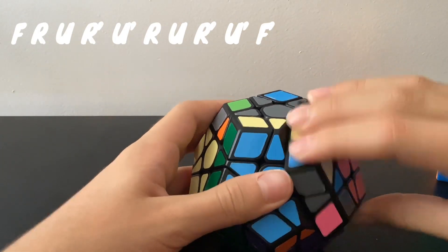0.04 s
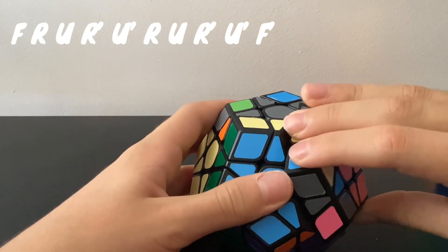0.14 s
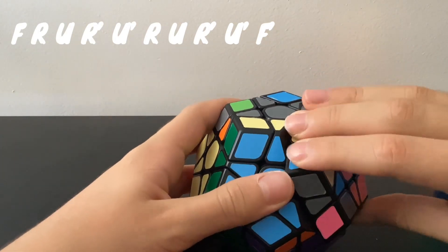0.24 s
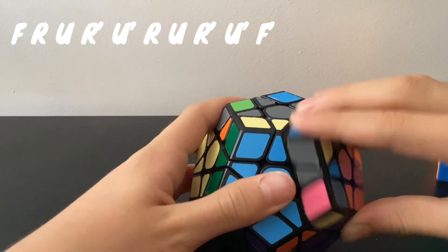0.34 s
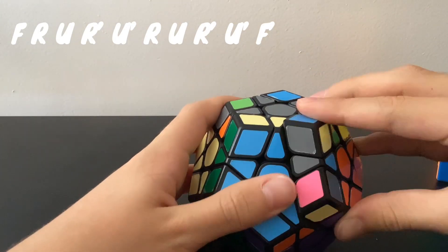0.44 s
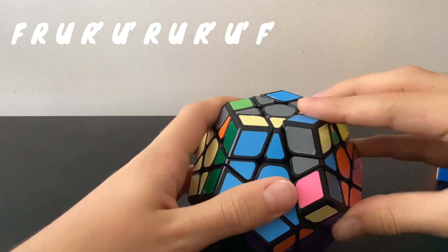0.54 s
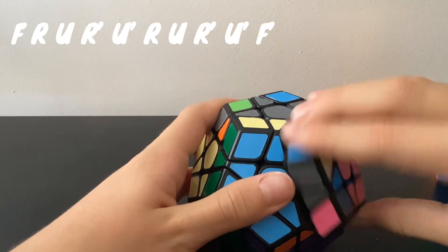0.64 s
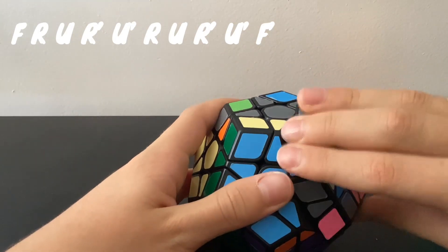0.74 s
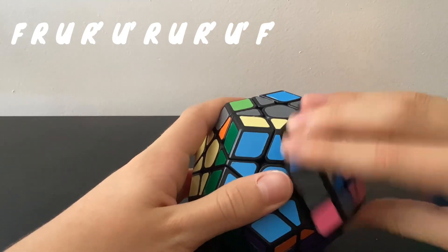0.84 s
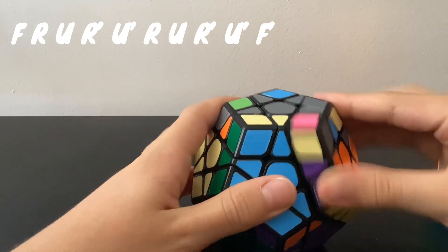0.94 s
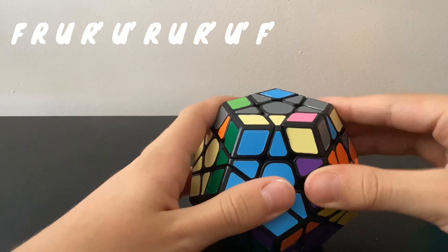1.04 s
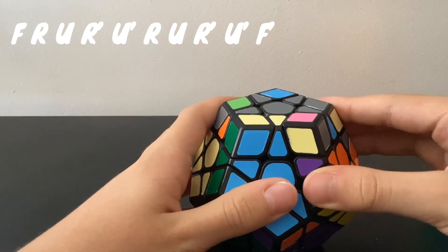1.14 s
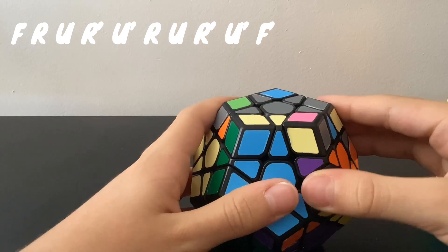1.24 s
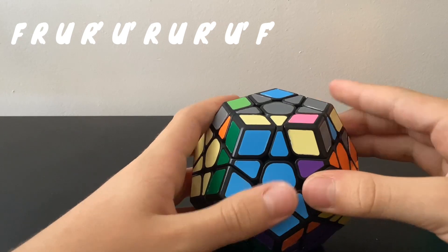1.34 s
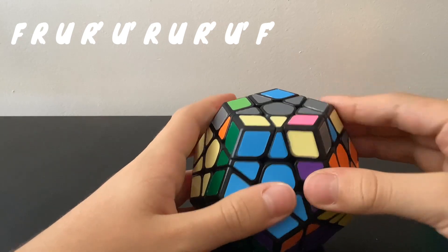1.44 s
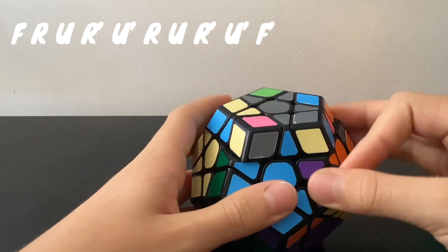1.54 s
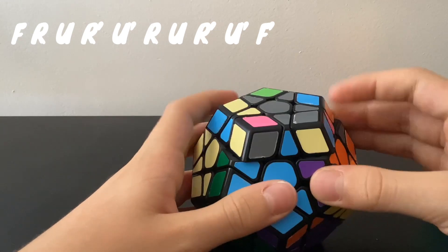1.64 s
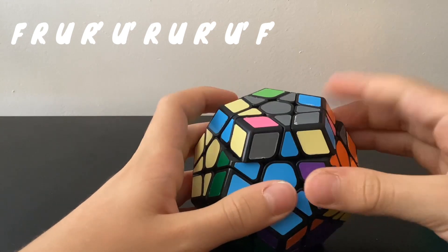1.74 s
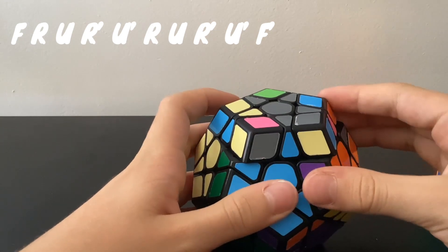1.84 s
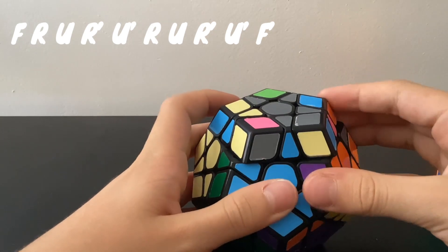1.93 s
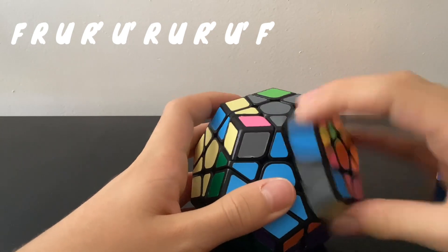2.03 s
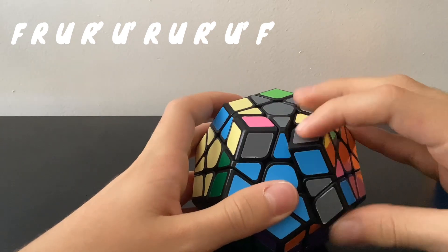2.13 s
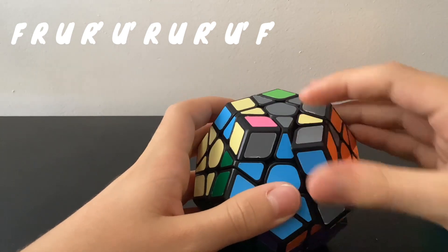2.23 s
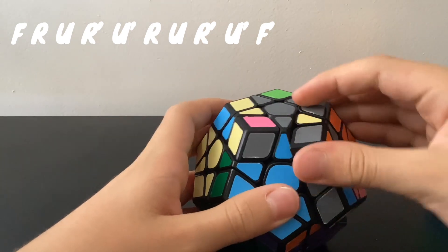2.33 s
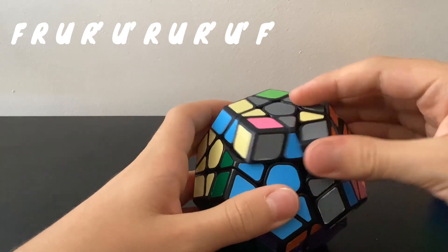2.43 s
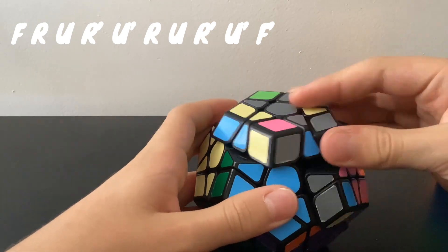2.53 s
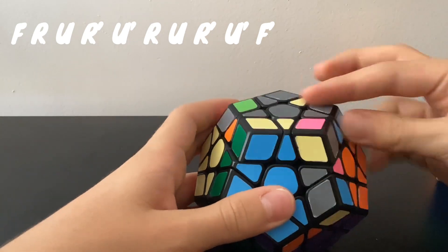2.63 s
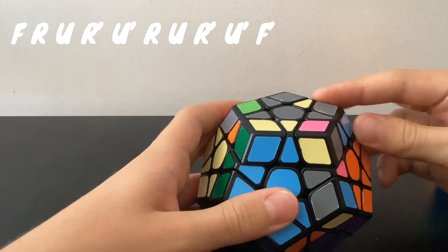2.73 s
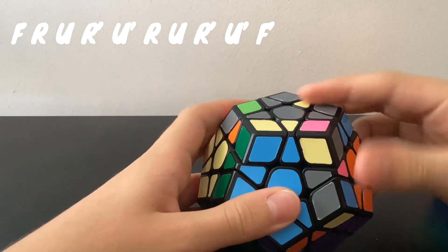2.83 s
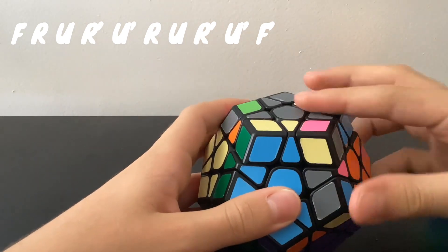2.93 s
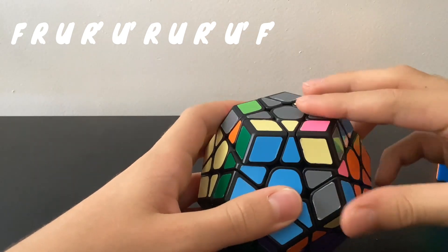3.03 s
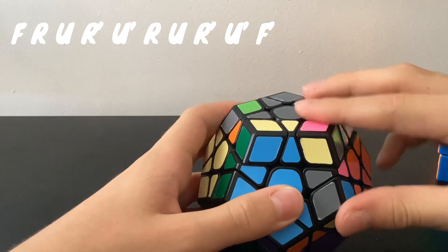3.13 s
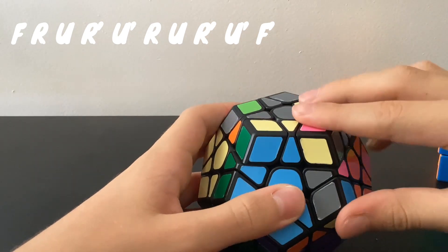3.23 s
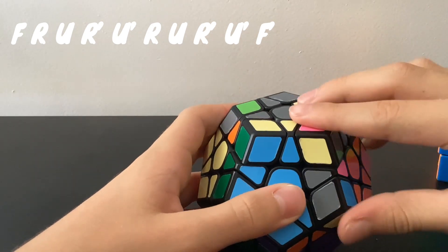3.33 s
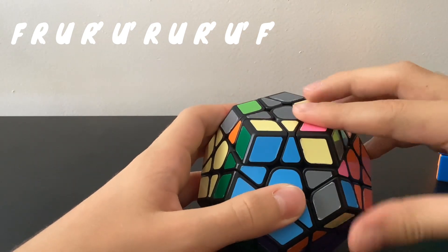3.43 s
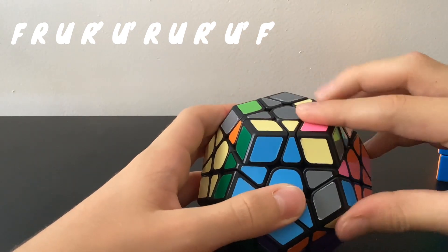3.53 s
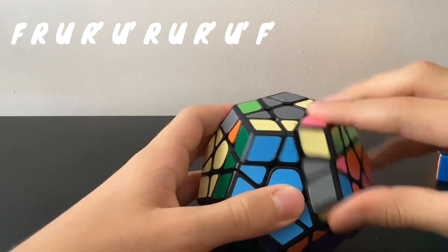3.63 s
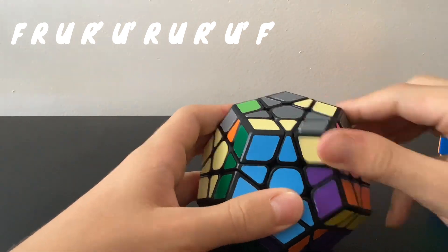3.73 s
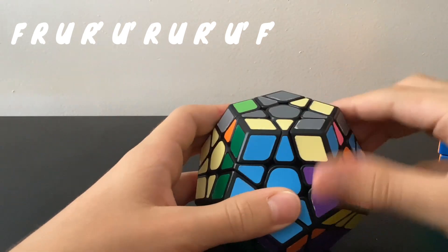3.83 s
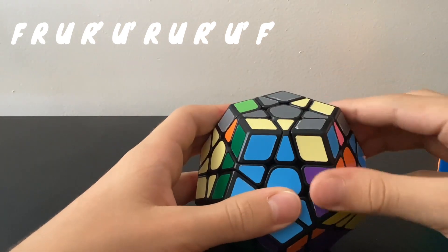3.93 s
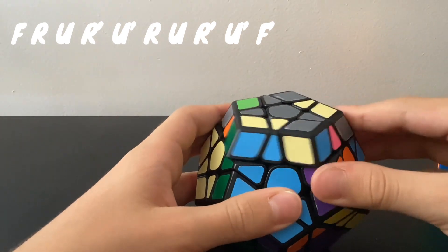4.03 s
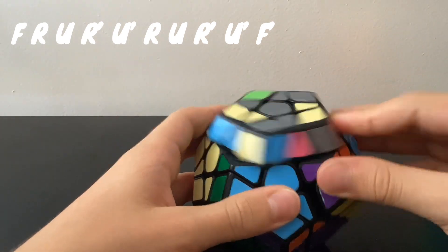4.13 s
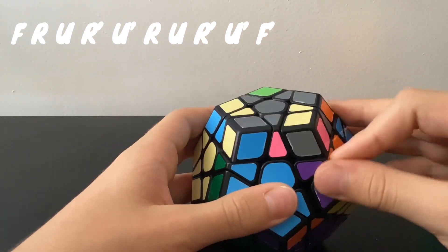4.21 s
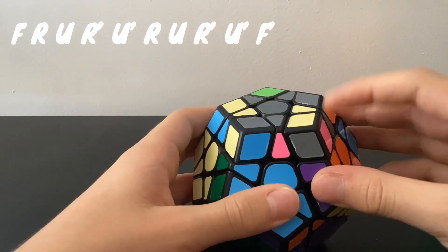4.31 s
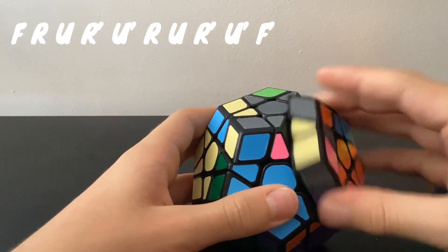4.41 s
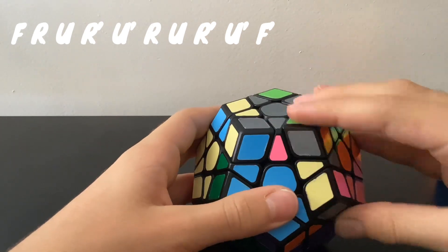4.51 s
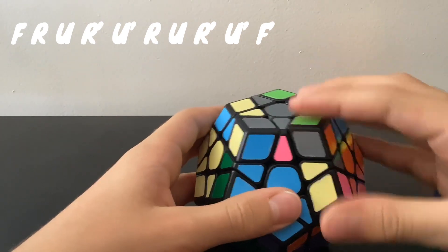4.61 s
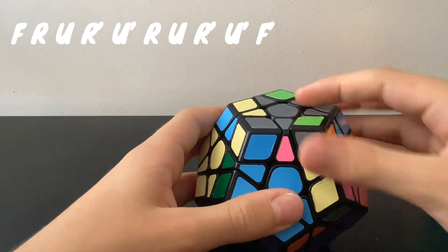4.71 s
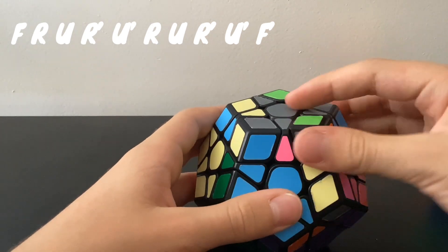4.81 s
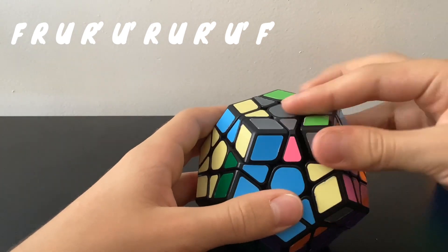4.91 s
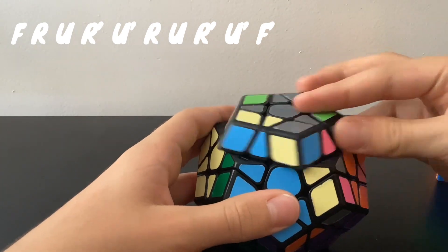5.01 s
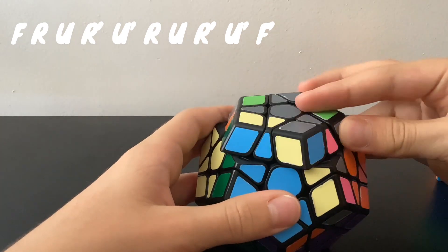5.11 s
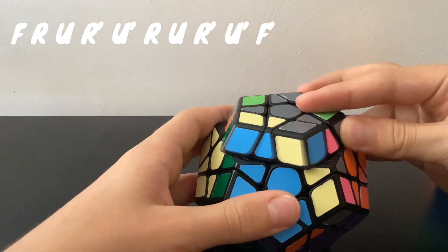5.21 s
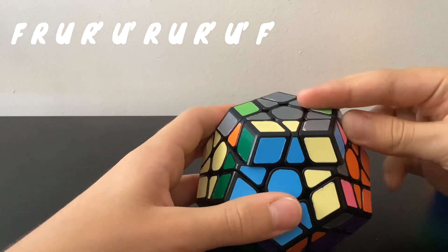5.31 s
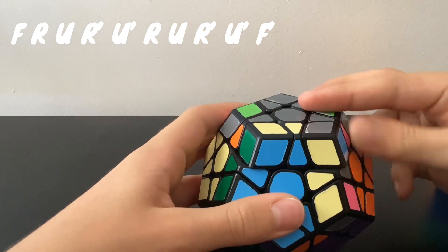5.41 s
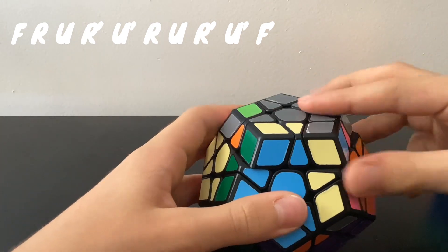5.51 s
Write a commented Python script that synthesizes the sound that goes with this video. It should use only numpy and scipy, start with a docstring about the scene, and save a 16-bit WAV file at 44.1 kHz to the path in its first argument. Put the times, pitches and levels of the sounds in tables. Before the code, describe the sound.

Hands quickly turn a twelve-sided plastic twisty puzzle, close to the microphone in a small room. Each turn is a brief cluster of clicks and clacks, with a hollow knock underneath and a light rub of sliding plastic. The turns come unevenly, ease off about halfway for a soft shift of grip, then resume. A faint low room noise lies behind.

```python
"""In a small room, a twelve-sided plastic twisty puzzle is turned quickly by hand, heard from close by.
In each turn the pieces catch, rattle and snap home: every impact excites damped modes of the corners,
edges and pieces, and the hollow core knocks under them. Sliding friction makes the layers rub, and
the gripping hands bump and brush softly. The room prolongs the impacts by reverberation and
standing waves."""
import sys
import numpy as np
from scipy import signal
from scipy.fft import rfft, irfft, next_fast_len
from scipy.io import wavfile
from scipy.ndimage import uniform_filter1d

SR = 44100
rng = np.random.default_rng(int(sys.argv[2]) if len(sys.argv) > 2 else 0)


def master(y):
    """Save y as 16-bit WAV."""
    cut = np.clip(np.atleast_2d(y).T, -1, 1)
    pcm = np.round(cut * 32767)  # scale
    wavfile.write(sys.argv[1], SR, pcm.astype(np.int16))


N = 245178

# Spectrum of the room's background noise: f/Hz, relative level/dB
AMBIENT_SPECTRUM = [(20, -36), (40, -17), (60, -4), (150, 1.5), (400, -13), (1200, -25), (3500, -35),
                    (5000, -36.5), (14000, -39), (16000, -47)]
# Reverberation time of the room: f/Hz, T60/s
ROOM_T60 = [(100, .9), (260, .35), (700, .29), (1840, .26), (4850, .23), (12800, .24)]
# Standing waves between the walls: f/Hz, bandwidth/Hz, relative level/dB
ROOM_MODES = [(87.1, 5.6, 29.5), (132, 4.6, 14), (186, 4.7, -5), (236.6, 48, 3.5), (312, 15, -24),
              (406, 36, -8.5), (577, 7.2, -37)]

# Spectra of skin on stickers and of the hands' rumble and boom: f/Hz, relative level/dB
SKIN_SPECTRUM = [(600, 2), (1500, 15), (3500, -5), (4300, -9), (6000, 0.5), (7700, -7), (9400, 3),
                 (12000, -15), (14500, -5), (16000, -22)]
RUMBLE_SPECTRUM = [(20, -49.5), (38, -38), (50, -7.5), (65, 8.5), (80, -9), (150, -13), (400, -95)]
BOOM_SPECTRUM = [(40, -39), (75, -15), (93, 1), (115, -14.5), (145, -3.5), (190, -11), (600, -100)]
# Fingertip strokes, Gaussian in time: centre t/s, peak level/dB, standard deviation/s
BRUSHES = [(2.252, -70.5, 0.051), (3.952, -61.5, 0.022), (4.686, -65, 0.054)]
# Shifts of grip in the lull: start t/s, end t/s, rumble level/dB, boom level/dB
REGRIPS = [(2.985, 3.056, -55.5, -73.5), (3.123, 3.2, -61, -63)]

# Spectrum of plastic sliding on plastic: f/Hz, relative level/dB
FRICTION_SPECTRUM = [(150, 9), (350, 22.5), (1000, 20.5), (1800, 18.5), (2400, 9.5), (3500, 1.5),
                     (4200, -1), (5800, -6), (7600, -3.5), (9300, -1.5), (11000, -22.5), (15000, -13.5)]
# Turns of a layer: start t/s, end t/s, rattle level/dB, friction level/dB, push level/dB
TURNS = [(0.035, 0.091, -57, -64, -51.5), (0.278, 0.406, -51.5, -56, -57.5),
         (0.598, 0.697, -61, -54, -48.5), (0.848, 0.99, -47.5, -48, -44.5), (1.283, 1.336, -79, -70, -52),
         (1.465, 1.547, -52, -51, -40), (1.624, 1.702, -80, -62, -53.5), (1.969, 2.087, -60, -55, -48),
         (2.353, 2.531, -58, -64, -56.5), (2.575, 2.674, -52.5, -64, -54), (3.643, 3.711, -52.5, -58, -59),
         (3.971, 4.07, -61, -74, -61.5), (4.076, 4.189, -55, -66, -46.5), (4.369, 4.482, -53.5, -58, -49),
         (4.808, 4.89, -57.5, -65, -57), (4.958, 5.023, -52.5, -72, -46.5), (5.228, 5.283, -54, -81, -55.5)]
# Normal modes of the puzzle's four parts: f/Hz, bandwidth/Hz, relative level/dB
CORE_MODES = [(139, 66, -9), (272.5, 87, -2), (350.7, 93.4, 1.5), (419, 137.6, -4), (547, 40, -11),
              (647.4, 38.4, -6)]
PIECE_MODES = [(737, 106, -4), (918, 117, 3.5), (1240, 210, 3.5), (1337, 386, 2), (1570, 296, 1),
               (1856, 320, -5.5)]
EDGE_MODES = [(2103, 32, -8.5), (2480, 104, -2.5), (2760, 870, -3), (3570, 262, 2.5), (4884, 610, -8.5),
              (5860, 370, -1.5), (6540, 1030, -22)]
CORNER_MODES = [(6970, 480, -4.5), (8620, 710, 0), (8980, 1100, -0.5), (12730, 1050, -17),
                (13660, 290, -11)]
# Pieces catching and snapping home: t/s, clack level/dB, knock re clack/dB, click re clack/dB
SNAPS = [(0.003, -47.5, 7, -14), (0.0391, -41, 4, -12.5), (0.048, -42.5, 5, -2.5), (0.263, -53.5, 8, -6),
         (0.2803, -65, -5, 1), (0.304, -52.5, 16, -7.5), (0.369, -44, 15.5, -9), (0.3889, -56, 8, -9),
         (0.4518, -54, 6, -14), (0.484, -68, 5, 0), (0.536, -57, -17, -30), (0.604, -42, 7, -14),
         (0.6518, -43, 0, -19.5), (0.717, -56.5, 12, -23), (0.83, -54, -2, -13), (0.849, -50.5, 9.5, -7),
         (0.8936, -41.5, 15, -11.5), (0.896, -42, 10.5, 1), (0.909, -37.5, 5.5, -14),
         (0.9188, -46, -3, -0.5), (0.959, -45.5, -15, -5.5), (0.977, -49.5, -2, -3.5),
         (1.0161, -48.5, 7.5, -6), (1.047, -46, 6.5, -13), (1.199, -57.5, 3, -9.5),
         (1.213, -59.5, 2.5, -15), (1.2705, -48.5, 8, -4.5), (1.444, -49.5, 6.5, -7), (1.482, -36, 0, -9),
         (1.491, -41, -1, -2.5), (1.504, -45.5, 7.5, 8), (1.5165, -37.5, 1.5, -2), (1.529, -52, 19, 2),
         (1.603, -57.5, 4, -2), (1.641, -49, 9.5, -13.5), (1.6816, -45, 2, -14), (1.938, -52.5, -3, -16.5),
         (1.965, -48.5, 13, -7.5), (1.978, -46, -12, -9), (1.995, -41.5, 5, -7), (2.002, -44, 0.5, -10),
         (2.01, -56.5, 10, 4.5), (2.032, -41, 3, -8.5), (2.0488, -42.5, 7.5, -10), (2.0517, -42, -3, -5.5),
         (2.337, -46.5, -0.5, -10.5), (2.37, -51.5, -9, -9), (2.4187, -47, 5, -6), (2.441, -48, 2.5, -10),
         (2.47, -55, 9.5, -6.5), (2.487, -54, 13.5, -6), (2.53, -58, 10, -11), (2.5819, -44.5, 3, -9.5),
         (2.602, -47, 7, -10), (2.627, -41.5, 8.5, -2.5), (2.7467, -57, 9, -20), (2.767, -50.5, 1, -9),
         (3.261, -51, 3.5, -14.5), (3.641, -52, 11, -7.5), (3.6493, -40.5, 6.5, -11.5),
         (3.666, -46, -6, -7), (3.694, -39, 6.5, -6.5), (3.971, -44.5, 1, -16), (4.024, -52.5, 8.5, -8.5),
         (4.048, -49, 2, -13.5), (4.0888, -45.5, 6.5, -8.5), (4.0955, -39.5, 5, -9), (4.136, -43, 9, -6.5),
         (4.1697, -38, 0, -10.5), (4.177, -43.5, 7.5, -4.5), (4.26, -47.5, -2, -12), (4.309, -53, 2, -19),
         (4.375, -45, 2.5, -2.5), (4.3845, -41.5, 5, -8.5), (4.398, -52, 8, -5.5), (4.451, -39, 3.5, -3.5),
         (4.459, -51.5, 11, -1), (4.648, -55, 11.5, -17.5), (4.7823, -54.5, -6, -9),
         (4.8403, -43.5, -0.5, -15), (4.8649, -48.5, 7.5, -10.5), (4.882, -43, 1, -16.5),
         (4.9617, -43.5, -24, -10), (4.97, -37.5, 1.5, -7), (4.974, -41, 4, -3.5), (4.9981, -55.5, 11.5, 5),
         (5.2246, -47.5, 8, -10.5), (5.2818, -59, 13, -8), (5.357, -48.5, 0, -10), (5.546, -49, 1, -13.5)]

IMPACT_SAMPLES, LEAD_S = 4096, .012  # an impact's scrape begins LEAD_S before its blow


def amp(db):
    """Amplitude ratio of a level in decibels."""
    return 10 ** (np.asarray(db) / 20)


def along(points, hz):
    """Interpolation of (f/Hz, value) points on a logarithmic frequency axis."""
    f, values = np.transpose(points)
    return np.interp(np.log(hz + 1), np.log(f), values)


def filtered(x, response):
    """Linear filtering: the spectrum of x is multiplied by a frequency response."""
    size = next_fast_len(N + SR)
    return irfft(rfft(x, size) * response(np.fft.rfftfreq(size, 1 / SR)), size)[:N]


def coloured(x, spectrum):
    """Spectral shaping of x, normalised to rms 1."""
    shaped = filtered(x, lambda hz: amp(along(spectrum, hz)))
    return shaped / np.sqrt(np.mean(shaped ** 2) + 1e-20)


def resonances(modes, hz):
    """Modal superposition: damped oscillators respond in sum, with alternating sign."""
    return sum((-1) ** k * amp(db) * 1j * hz * width / (f * f - hz * hz + 1j * hz * width)
               for k, (f, width, db) in enumerate(modes))


def radiated(modes, hz):
    """Band-limited radiation: little leaves a part outside its range of modes; mean power 1."""
    low, high = 1j * hz / modes[0][0], 1j * hz / (modes[-1][0] * 1.88)
    highpass = low ** 2 / (1 + np.sqrt(2) * low + low ** 2)
    lowpass = 1 / (1 + np.sqrt(2) * high + high ** 2)
    response = resonances(modes, hz) * highpass * lowpass
    return response / np.sqrt(np.mean(np.abs(response) ** 2))


def strokes(start, end, level_db, attack_s, release_s):
    """Summed envelopes: exponential growth, a plateau from start to end, exponential decay."""
    t = np.arange(N) / SR
    return sum(amp(db) * np.exp(np.minimum(t - a, 0) / attack_s - np.maximum(t - b, 0) / release_s)
               for a, b, db in zip(start, end, level_db))


def add(track, sound, start_s):
    """Superposition of a sound on a track from start_s on."""
    start = round(start_s * SR)
    sound = sound[max(-start, 0):]
    part = track[max(start, 0):][:len(sound)]
    part += sound[:len(part)]


def ambient_noise(level_db):
    """Stationary noise, strongest in the bass, forms the room's background."""
    return amp(level_db) * coloured(rng.standard_normal(N), AMBIENT_SPECTRUM)


def room_tail(gap_s, build_s):
    """Reverberation: a diffuse field builds up and decays, the bass most slowly; energy 1."""
    hz, t, noise = signal.stft(rng.standard_normal(SR * 2 // 5), SR, nperseg=256)
    decay = amp(-60 * t / along(ROOM_T60, hz)[:, None])
    tail = signal.istft(noise * decay, SR, nperseg=256)[1]
    since_reflection = np.maximum(np.arange(len(tail)) / SR - gap_s, 0)
    tail *= 1 - np.exp(-since_reflection / build_s)
    return tail / np.linalg.norm(tail)


def standing_waves(sound):
    """Room resonance: modes between the walls hum on after the sound that drives them."""
    return amp(-23) * filtered(sound, lambda hz: resonances(ROOM_MODES, hz))


def fingertips():
    """Friction of skin on the stickers gives swells of soft, bright hiss."""
    t = np.arange(N) / SR
    envelope = sum(amp(db) * np.exp(-.5 * ((t - centre) / sigma) ** 2) for centre, db, sigma in BRUSHES)
    return envelope * coloured(rng.standard_normal(N), SKIN_SPECTRUM)


def hands(rumble_lag_s, rumble_re_push_db, hold_db):
    """Pushes and regrips modulate the amplitude of two noise bands: a hollow boom and a deep rumble."""
    start, end, _, _, push_db = np.transpose(TURNS)
    shift, rest, rumble_db, boom_db = np.transpose(REGRIPS)
    press = lambda a, b, db: strokes(a, b, db, attack_s=.011, release_s=.043)
    rumble = press(start + rumble_lag_s, end + rumble_lag_s, push_db + rumble_re_push_db)
    rumble += press(shift, rest, rumble_db)
    boom = press(start, end, push_db) + press(shift, rest, boom_db)
    boom += amp(hold_db)  # merely holding the puzzle booms faintly
    out = np.zeros(N)
    for envelope, spectrum in [(rumble, RUMBLE_SPECTRUM), (boom, BOOM_SPECTRUM)]:
        noise = coloured(rng.standard_normal(N), spectrum)
        running_rms = np.sqrt(np.abs(uniform_filter1d(noise ** 2, size=SR // 12)) + 1e-6)
        out += envelope * noise / running_rms
    return out


def sliding(slips_per_s, grain_db):
    """Stick-slip friction: the faces of a turning layer rub in a dense stream of tiny random slips."""
    start, end, _, friction_db, _ = np.transpose(TURNS)
    slipping = rng.random(N) < slips_per_s / SR
    slips = slipping * rng.standard_normal(N) * amp(grain_db * rng.standard_normal(N))
    envelope = strokes(start, end, friction_db, attack_s=.017, release_s=.03)
    return envelope * coloured(slips, FRICTION_SPECTRUM)


def rattles(per_turn, spread_db):
    """Mechanical play: loose pieces collide at random moments of each turn; rows as in SNAPS."""
    start, end, level_db = np.transpose(TURNS)[:3, :, None]
    times = start + (end - start) * (np.arange(per_turn) + rng.random((len(TURNS), per_turn))) / per_turn
    scatter = spread_db * rng.standard_normal((len(TURNS), per_turn, 3))
    clack_db = level_db + scatter[..., 0]
    weight_db, bright_db = 7 + scatter[..., 1], -13.5 + scatter[..., 2]
    return np.column_stack([column.ravel() for column in (times, clack_db, weight_db, bright_db)])


def rebounds(delay_s, clack_db, weight_db):
    """Inelastic rebound: a caught piece drops back on the core, softer and duller; rows as in SNAPS."""
    return np.array(SNAPS) + [delay_s, clack_db, weight_db, 0]


def ringing(modes, hardness, contact_s, chatter_db, spread_db, detune, scrape_db, scrape_s):
    """Forced vibration: a scrape and a chattering pulse drive the modes; a row of energy 1 per impact."""
    count = len(hardness)
    hz = np.fft.rfftfreq(IMPACT_SAMPLES, 1 / SR)
    t = np.arange(IMPACT_SAMPLES) / SR - LEAD_S
    # a harder impact has a shorter pulse and less scrape
    pulse_time = np.maximum(t, 0) / (contact_s * np.exp(-.25 * hardness))
    pulse = pulse_time * np.exp(1 - pulse_time)
    # the pieces graze briefly before they meet and longer while they settle
    graze = np.exp(-np.abs(t) / np.where(t < 0, .62 * scrape_s, scrape_s))
    envelope = pulse + amp(scrape_db - 5.2 * hardness) * graze
    force = envelope * rng.standard_normal(envelope.shape)
    force *= amp(chatter_db * rng.standard_normal(envelope.shape))
    # every piece differs a little in size and is struck at another spot
    draws = rng.standard_normal((count, len(modes), 2))
    pieces = [[(f * np.exp(detune * size), width, db + spread_db * spot)
               for (f, width, db), (size, spot) in zip(modes, row)] for row in draws]
    ring = irfft(rfft(force) * np.array([radiated(piece, hz) for piece in pieces]))
    return ring / np.linalg.norm(ring, axis=1, keepdims=True)


def impacts():
    """Impact excitation: the core knocks, pieces clack, edges click, corners tick; the room responds."""
    collisions = np.vstack([SNAPS, rebounds(delay_s=.008, clack_db=-18, weight_db=8.5),
                            rattles(per_turn=7, spread_db=2)])
    times, clack_db, weight_db, bright_db = collisions.T
    knock_db, click_db = clack_db + weight_db, clack_db + bright_db
    # a louder click means a harder impact; an average one has hardness 0
    hardness = np.clip((click_db + 66.5) / 17.5, -1, 1.5)[:, None]
    tick_db = click_db - 5.5 + 3.4 * hardness[:, 0]
    knocks = ringing(CORE_MODES, hardness / 2, contact_s=.0016, chatter_db=2,
                     spread_db=1, detune=.021, scrape_db=-16.5, scrape_s=.0073)
    clacks = ringing(PIECE_MODES, hardness, contact_s=.00084, chatter_db=3.5,
                     spread_db=-1.5, detune=.042, scrape_db=2.5, scrape_s=.0026)
    clicks = ringing(EDGE_MODES, hardness, contact_s=.0005, chatter_db=7,
                     spread_db=2.5, detune=.04, scrape_db=0, scrape_s=.0035)
    ticks = ringing(CORNER_MODES, hardness, contact_s=.00068, chatter_db=-3,
                    spread_db=1, detune=.036, scrape_db=-4, scrape_s=.0047)
    tails = [room_tail(gap_s=.0019, build_s=.0023) for _ in times]

    def in_room(modes, sounds, level_db, room_db):
        """Direct sound of one part plus its reverberant field."""
        direct, diffuse = np.zeros(N), np.zeros(N)
        gains = amp(level_db) * np.sqrt(SR / 100)  # level is the rms of the energy spread over 10 ms
        for start, gain, sound, tail in zip(times, gains, sounds, tails):
            add(direct, gain * sound, start - LEAD_S)
            add(diffuse, gain * tail, start)
        # the walls gather sound from all sides of the puzzle, so they return its average colour
        return direct + amp(room_db) * filtered(diffuse, lambda hz: radiated(modes, hz))

    out = (in_room(CORE_MODES, knocks, knock_db, room_db=-6)
           + in_room(PIECE_MODES, clacks, clack_db, room_db=-4.5)
           + in_room(EDGE_MODES, clicks, click_db, room_db=-4)
           + in_room(CORNER_MODES, ticks, tick_db, room_db=-8.5))
    return out + standing_waves(out)


def scene():
    """Superposition of background, puzzle and hands, in mono."""
    background = ambient_noise(level_db=-66.5)
    puzzle = impacts() + sliding(slips_per_s=5900, grain_db=3.5)
    handling = hands(rumble_lag_s=.033, rumble_re_push_db=-11, hold_db=-69.5) + fingertips()
    return (background + puzzle + handling)[None]


def record(dry):
    """Band limiting: a steep low-pass removes the highest treble."""
    cutoff_hz = 15900
    return filtered(dry[0], lambda hz: 1 / (1 + (hz / cutoff_hz) ** 120))[None]


dry = scene()
out = record(dry)
master(out)
```